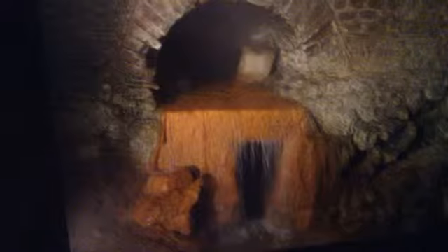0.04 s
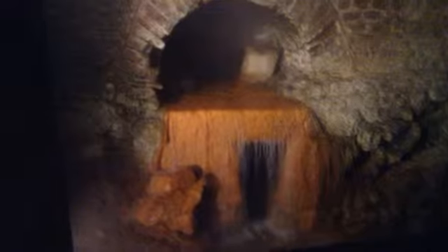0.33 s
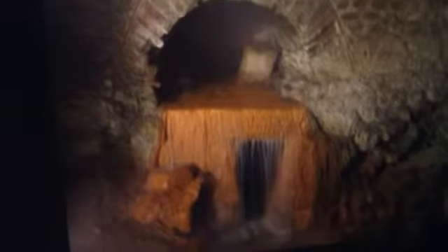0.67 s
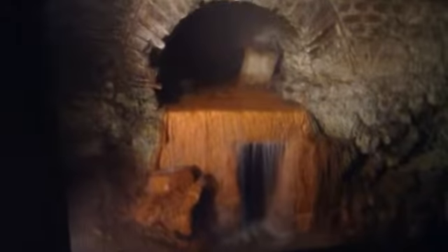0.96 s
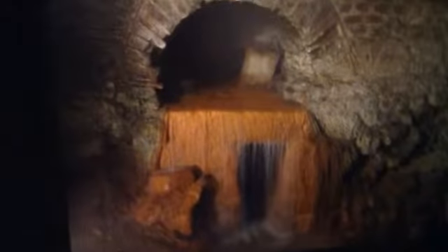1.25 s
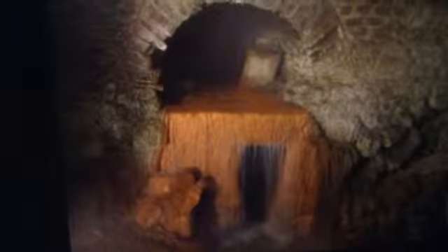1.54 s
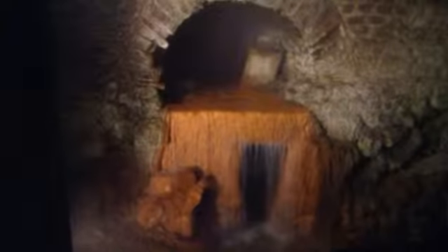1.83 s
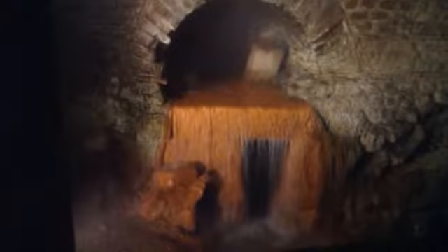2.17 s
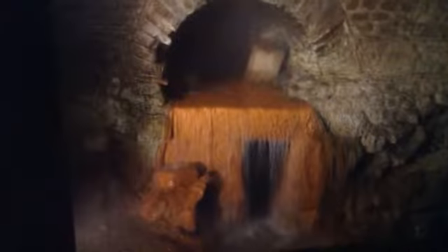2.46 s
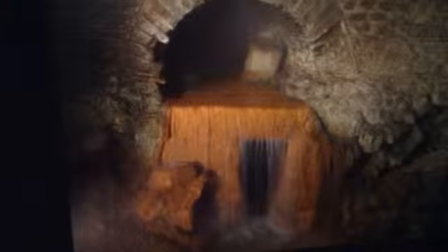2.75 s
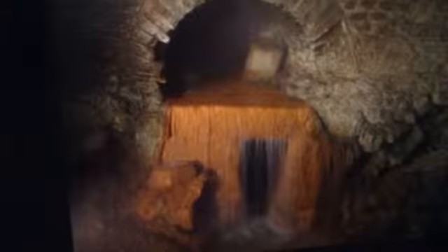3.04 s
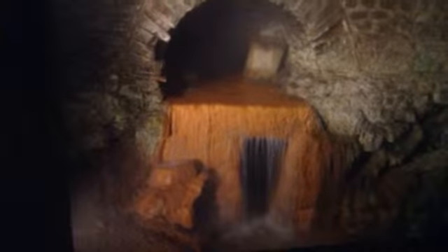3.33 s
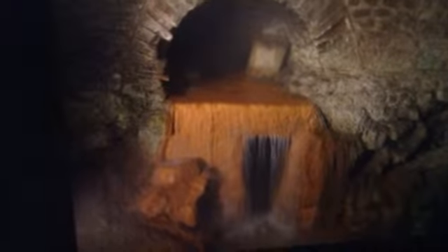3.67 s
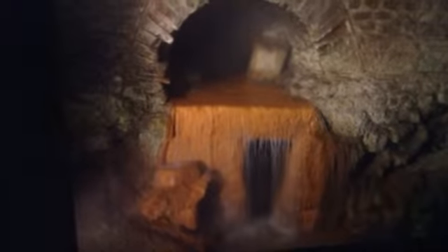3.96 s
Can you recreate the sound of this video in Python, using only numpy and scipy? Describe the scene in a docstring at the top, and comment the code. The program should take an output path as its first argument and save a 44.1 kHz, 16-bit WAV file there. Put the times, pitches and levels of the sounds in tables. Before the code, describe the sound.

Water pours steadily over a ledge into a pool inside a small stone vault.

```python
"""Spring water pours over a ledge into a pool inside a small stone vault, heard in mono.
After a moment of silence, an even rush of countless drops and bubbles cuts in. From then on the
falling sheet of water keeps the vault's low notes ringing; the strongest booms in irregular swells.
Soon a large bubble plinks, then a brighter splash follows; more of both come now and then."""
import sys
import numpy as np
from scipy import signal
from scipy.fft import rfft, irfft
from scipy.io import wavfile

SR = 44100
rng = np.random.default_rng(int(sys.argv[2]) if len(sys.argv) > 2 else 0)


def bounce(signal):
    """Save signal as a 16-bit WAV file at the path given by the first command-line argument."""
    frames = np.transpose(np.atleast_2d(signal))
    limited = np.clip(frames, -1, 1)
    pcm = np.round(limited * 32767).astype(np.int16)
    wavfile.write(sys.argv[1], SR, pcm)


N = 176400
TOP_HZ = 15350  # upper edge of the sound

# How strong the falling water is from low to high: (frequency [Hz], relative level [dB])
WATER_TONE = [(25, -38), (50, -33), (66, -27), (90, -14.5), (112, -8.5), (170, -1.5), (260, -.5), (350, -4),
              (460, -3.8), (640, -.3), (1000, -.6), (1480, -1.1), (2200, .2), (3300, -.4), (4000, .3),
              (5500, -1), (8000, -1), (11000, -2.7), (13500, -4.4), (15300, -6.7)]


def gain(db):
    """Turn decibels into a number to multiply by."""
    return 10 ** (np.asarray(db) / 20)


def set_level(x, db):
    """Scale a sound to an average (rms) level."""
    return x * gain(db) / np.sqrt(np.mean(x ** 2))


def freqs():
    """The frequency in Hz of each slot in a spectrum, at least 1."""
    return np.maximum(np.arange(N // 2 + 1) * SR / N, 1)


def shape_tone(x, points):
    """Turn lows and highs up or down along a curve through (Hz, dB) points."""
    hz, db = np.array(points).T
    curve_db = np.interp(np.log(freqs()), np.log(hz), db)
    return irfft(rfft(x) * gain(curve_db), N)


def noise_band(hz, width_hz):
    """Noise kept close to one pitch, with an average (rms) size of 1."""
    f = freqs()
    off_pitch = (f / hz - hz / f) * hz / (np.pi / 2 * width_hz)
    return set_level(irfft(rfft(rng.standard_normal(N)) / (1 + 1j * off_pitch) ** 2, N), 0)


def wander(per_s):
    """A smooth random curve of typical size 1 that changes about per_s times a second."""
    smoothing = np.exp(-(2 * freqs() / per_s) ** 2)
    return set_level(irfft(rfft(rng.standard_normal(N)) * smoothing, N), 0)


def rush(db=-22):
    """Fine spray and foam, too dense to tell apart, make a steady hiss."""
    return set_level(shape_tone(rng.standard_normal(N), WATER_TONE), db)


def drops(per_s=6500, spread_db=5.0, db=-26):
    """Drops hit the pool with sharp ticks, many small and a few large."""
    lands = rng.random(N) < per_s / SR
    sizes = gain(spread_db * np.minimum(rng.standard_normal(N), 2.6))
    ticks = lands * rng.choice([-1, 1], N) * sizes
    return set_level(shape_tone(ticks, WATER_TONE), db)


def bubbles(per_s=900, low_hz=443.4, high_hz=8250, spread_db=4, db=-34.5):
    """Trapped air rings briefly, rising in pitch as it nears the surface."""
    fade_cycles, rise = 12.8, 0.0916  # cycles to fade to 37%; share the pitch rises meanwhile
    chances = rng.random((8000, 2))[:int(per_s * N / SR)]
    strengths = gain(spread_db * np.clip(rng.standard_normal(8000), -2, 2))
    out = np.zeros(N)
    for (when, pitch), strength in zip(chances, strengths):
        hz = low_hz * (high_hz / low_hz) ** np.sqrt(pitch)
        start = int(when * N)
        length = min(int(2 * np.pi * fade_cycles * SR / hz), N - start)
        age = np.arange(length) * hz / SR / fade_cycles  # counted in fade times
        tone = np.cos(2 * np.pi * fade_cycles * age * (1 + rise * age / 2))
        out[start:start + length] += strength * np.sqrt(hz) * np.exp(-age) * tone
    return set_level(out, db)


def vault_echo(x, t, length_s=0.43, echo_db=-7):
    """Close stone walls add a dense, short echo."""
    tail = rng.standard_normal(N) * gain(-60 * t / length_s) * (1 - np.exp(-t / .006))
    echo = irfft(rfft(x) * rfft(tail / np.sqrt(np.sum(tail ** 2))), N)
    return (x + gain(echo_db) * echo) / np.sqrt(1 + gain(echo_db) ** 2)


def churn(x, bands=14, shared_db=0.39, flicker_db=0.65):
    """The sheet breaks up unevenly: bands of pitch swell with their neighbours and flicker alone."""
    band_position = np.interp(np.log(freqs()), np.log([250, TOP_HZ]), [0, bands - 1])
    drifts = [wander(per_s=31) for _ in range(bands + 2)]
    spectrum, out = rfft(x), 0
    for k in range(bands):
        band = irfft(spectrum * np.maximum(1 - abs(band_position - k), 0), N)
        shared = sum(drifts[k:k + 3]) / np.sqrt(3)
        out += band * gain(shared_db * shared + flicker_db * wander(per_s=49))
    return out


def vault_ring(waver_db=1.5):
    """The vault's own notes (its resonances) come and go as the water stirs them."""
    # Notes the vault rings at: (pitch [Hz], width [Hz], level [dB])
    notes = [(78.5, 6, -58), (153.8, 8, -43), (193.7, 17, -43.5), (306, 21, -46.5), (397.8, 21.3, -45.5),
             (498, 5, -50), (600.6, 11.4, -45.5), (679.4, 20, -47.5), (773.6, 15, -47), (1280, 63, -44.5)]
    out = 0
    for hz, width_hz, db in notes:
        note = noise_band(hz, width_hz) * gain(waver_db * wander(per_s=12.5))
        out += set_level(note, db)
    return out


def boom(t, base_hz=131.8, waver_hz=3.95, base_db=-44, waver_db=7.5):
    """The vault's strongest note wavers and swells as the sheet plunges in."""
    # Swells of the boom: (peak time [s], half length [s], pitch [Hz], level [dB])
    swells = [(0.178, 0.054, 130, -41), (0.478, 0.019, 131, -31), (0.853, 0.046, 134.7, -35),
              (1.395, 0.025, 129.2, -32.5), (1.59, 0.026, 135.5, -35), (1.894, 0.028, 127.4, -33.5),
              (2.343, 0.042, 132.5, -31), (2.747, .018, 138, -33), (3.017, 0.025, 136, -30),
              (3.29, 0.048, 126.3, -30.5), (3.529, 0.019, 131.3, -33), (3.835, 0.044, 128, -37)]
    power = gain(base_db + waver_db * np.tanh(wander(per_s=46))) ** 2
    weighted_hz = power * (base_hz + waver_hz * wander(per_s=46))
    for peak, half_length, hz, db in swells:
        swell = (gain(db) * np.exp(-.5 * ((t - peak) / half_length) ** 2)) ** 2
        power += swell
        weighted_hz += swell * hz
    pitch_hz = weighted_hz / power  # each swell pulls the note towards its own pitch
    return np.sqrt(2 * power) * np.sin(2 * np.pi * np.cumsum(pitch_hz) / SR)


def plinks(t, onset_s=0.0012, rise=0.0022):
    """Single large bubbles ring out above the rush, rising slightly in pitch as they fade."""
    # Large bubbles: (time [s], pitch [Hz], fade time [s], level before fading [dB])
    large_bubbles = [(.37, 538, .025, -27.5), (.503, 2160, .016, -31), (.651, 645, .014, -24),
                     (1.248, 4380, .018, -27), (1.79, 2200, .007, -19), (1.875, 886, 0.022, -27),
                     (3.101, 670, 0.0077, -21), (3.139, 1180, 0.01, -28), (3.289, 4555, 0.005, -23),
                     (3.296, 1300, .007, -21), (3.329, 6770, .011, -23)]
    out = 0
    for start, hz, fade_s, db in large_bubbles:
        age = np.maximum(t - start, 0)
        loudness = gain(db) * (1 - np.exp(-age / onset_s)) * np.exp(-age / fade_s)
        cycles = hz * age * (1 + rise * age / fade_s / 2)
        out += loudness * np.sin(2 * np.pi * cycles)
    return out


def splashes(t, onset_s=0.0053):
    """Larger lumps of water slap the pool in short, bright bursts of spray."""
    # Bursts of spray: (time [s], middle pitch [Hz], fade time [s], level before fading [dB])
    bursts = [(0.506, 2150, 0.034, -23.5), (.6885, 7500, 0.0033, -6), (1.495, 2800, 0.033, -25),
              (1.632, 6170, 0.012, -15), (1.668, 3970, 0.014, -19), (3.29, 5000, .02, -22),
              (3.767, 4440, .006, -17)]
    out = 0
    for start, hz, fade_s, db in bursts:
        age = np.maximum(t - start, 0)
        loudness = gain(db) * (1 - np.exp(-age / onset_s)) * np.exp(-age / fade_s)
        out += loudness * noise_band(hz, width_hz=0.32 * hz)
    return out


def scene():
    """Water and vault together, the same in both channels."""
    t = np.arange(N) / SR
    water = churn(rush() + vault_echo(drops() + bubbles(), t))
    water *= gain(0.26 * wander(per_s=8.4))  # the whole sheet flows a little unsteadily
    mono = water + splashes(t) + plinks(t) + boom(t) + vault_ring()
    return np.array([mono, mono])


def record(dry, start_s=.083):
    """The sound cuts in suddenly, and its very highest part is cut off steeply."""
    fade_in = np.clip((np.arange(N) / SR - start_s) / .002, 0, 1)
    treble_cut = signal.ellip(12, .1, 80, TOP_HZ, fs=SR, output="sos")
    return signal.sosfilt(treble_cut, dry * fade_in)


dry = scene()
out = record(dry)
bounce(out)
```